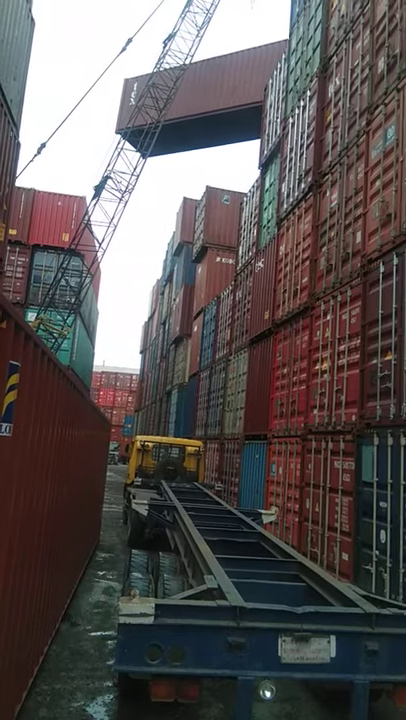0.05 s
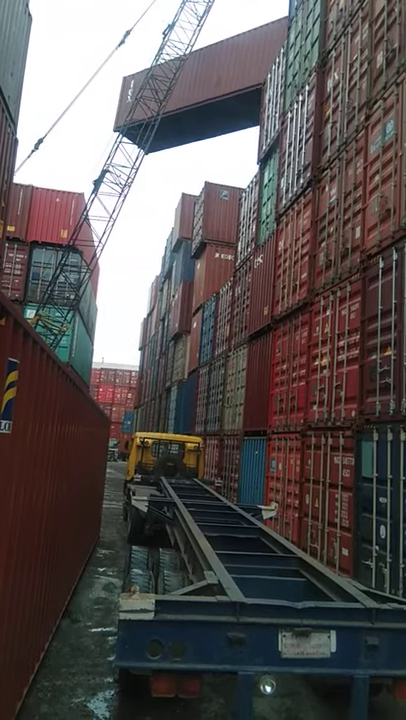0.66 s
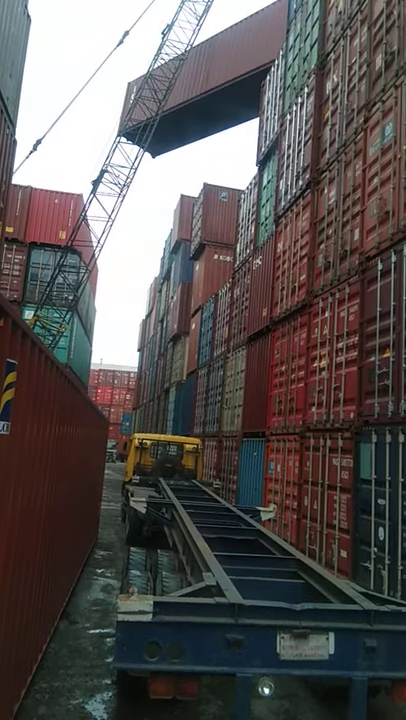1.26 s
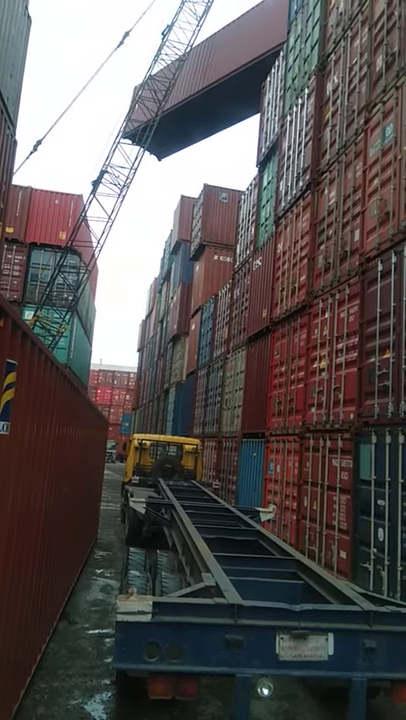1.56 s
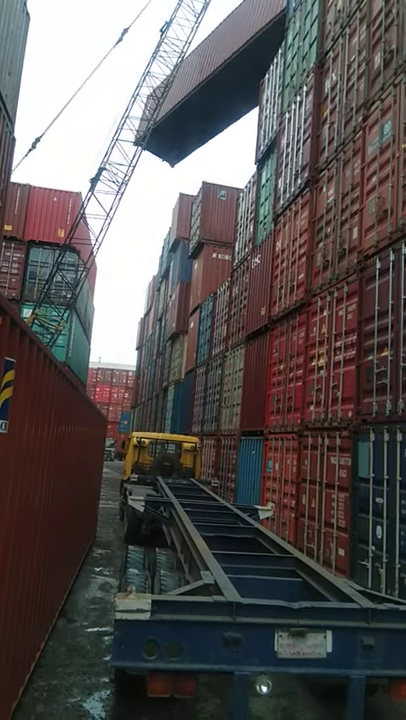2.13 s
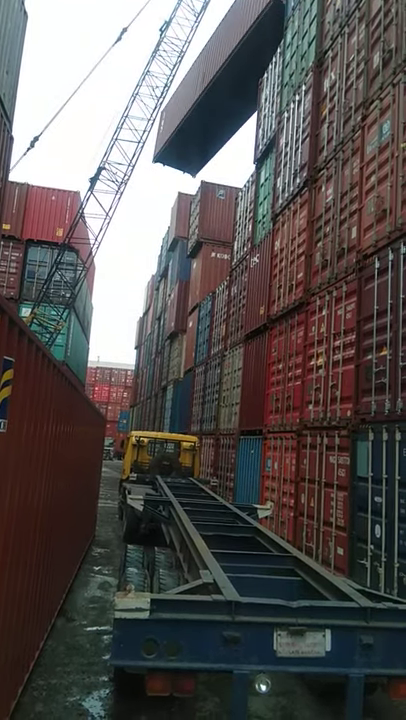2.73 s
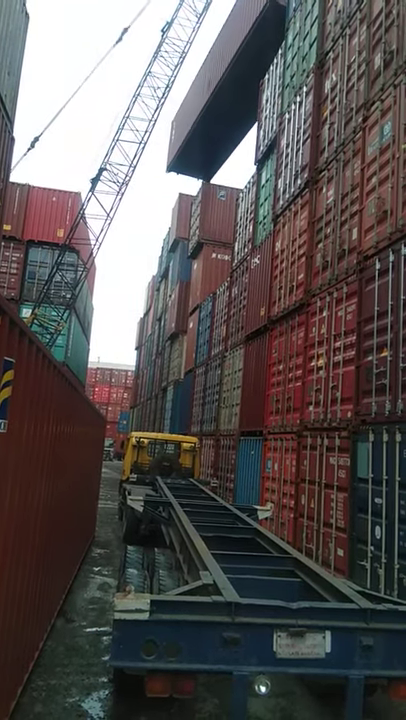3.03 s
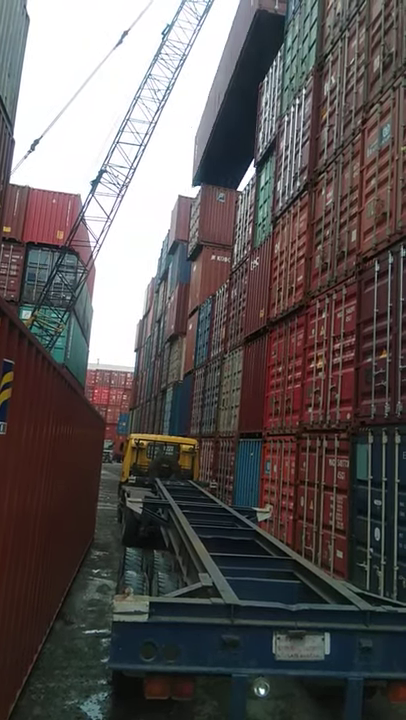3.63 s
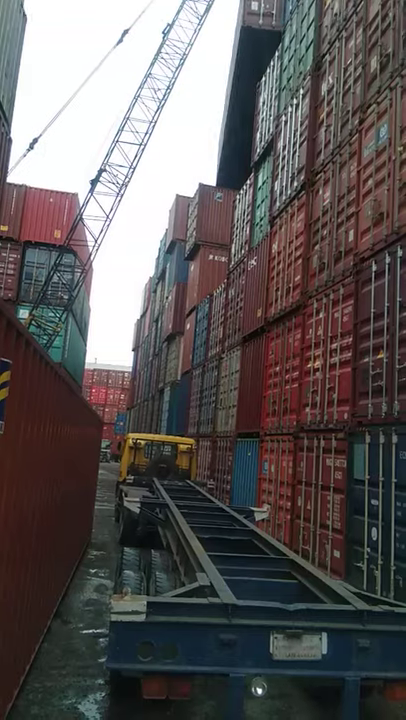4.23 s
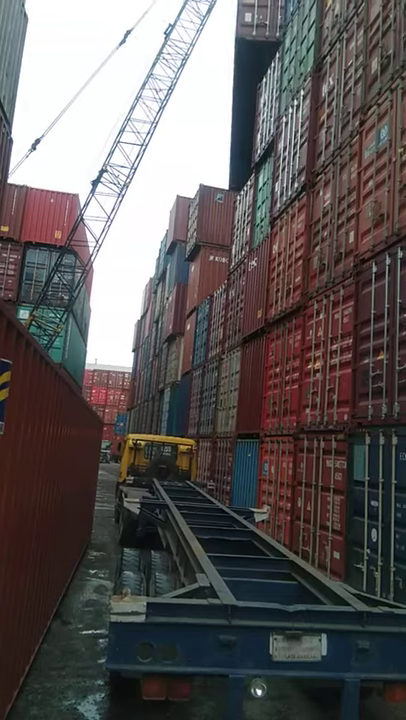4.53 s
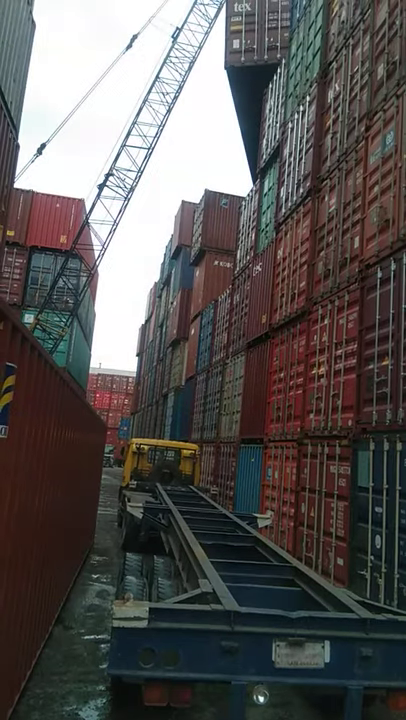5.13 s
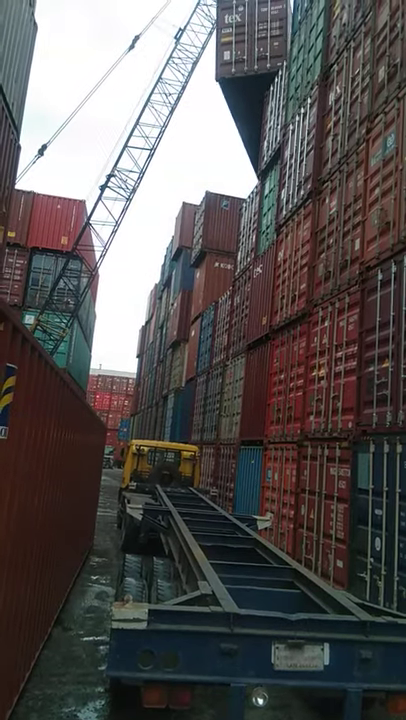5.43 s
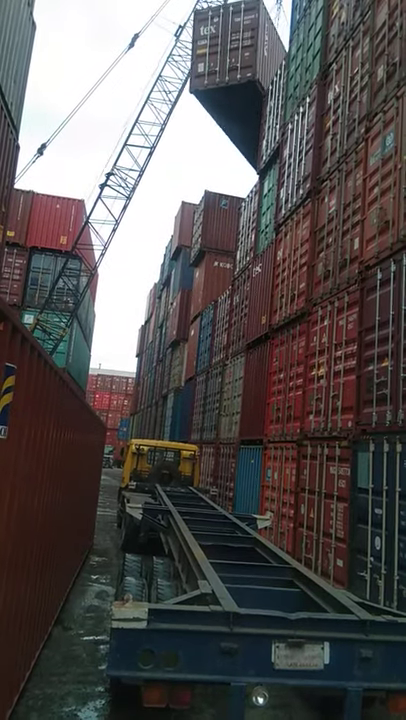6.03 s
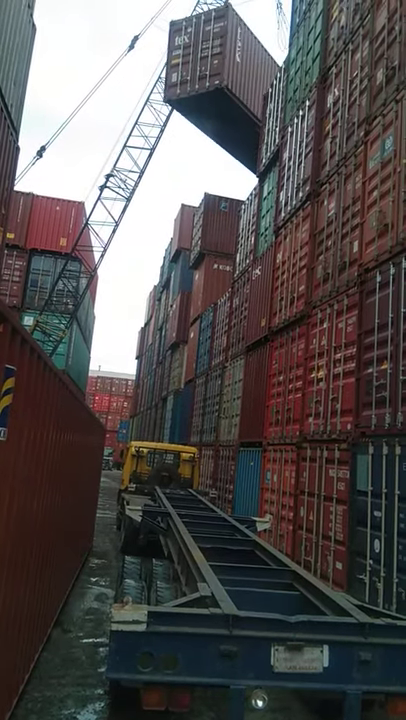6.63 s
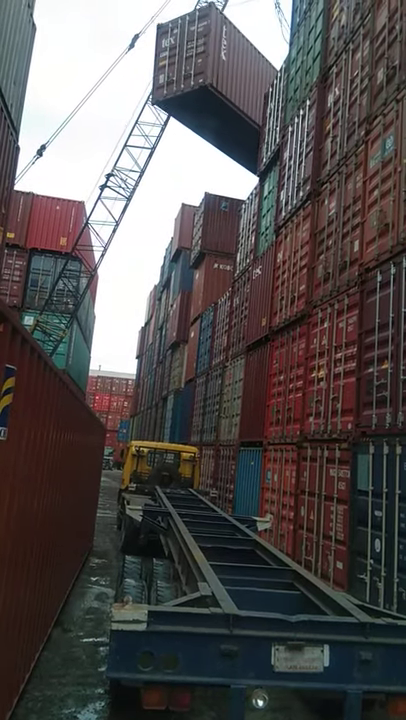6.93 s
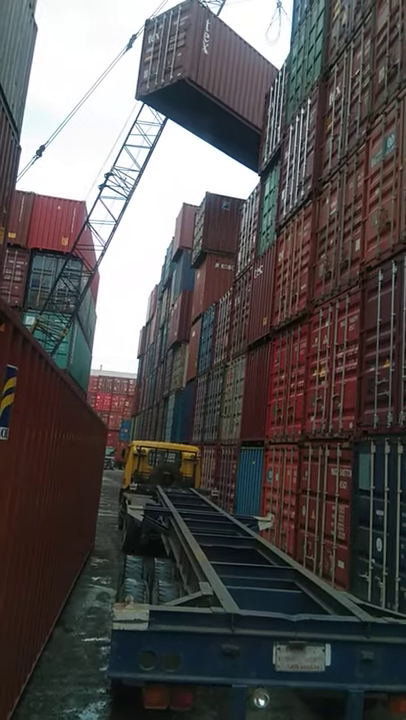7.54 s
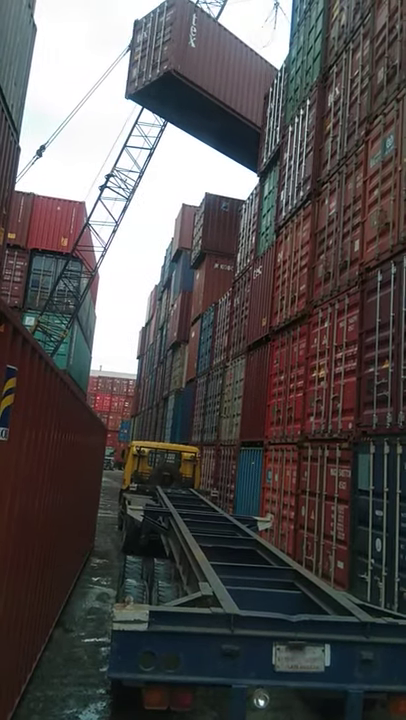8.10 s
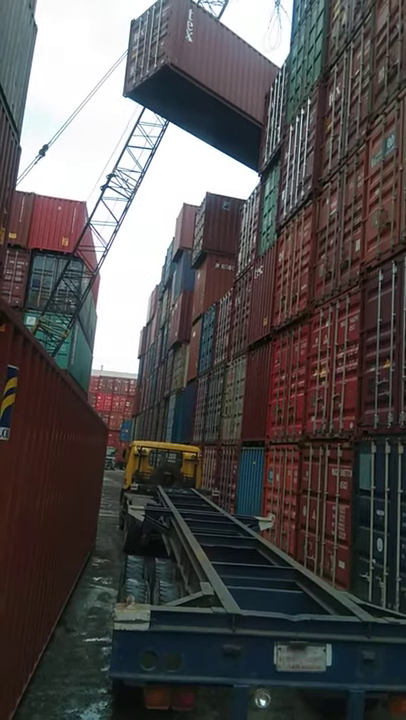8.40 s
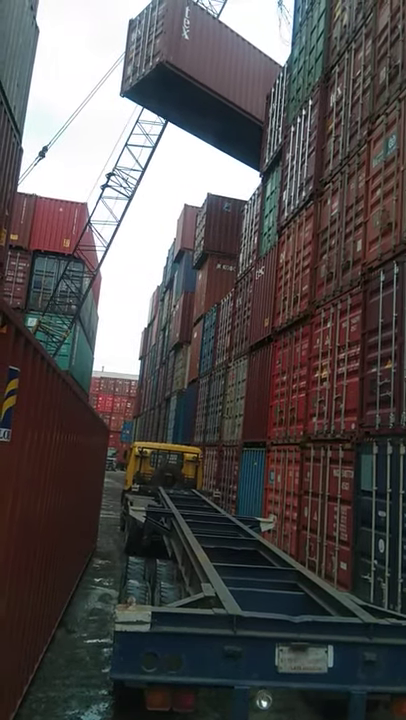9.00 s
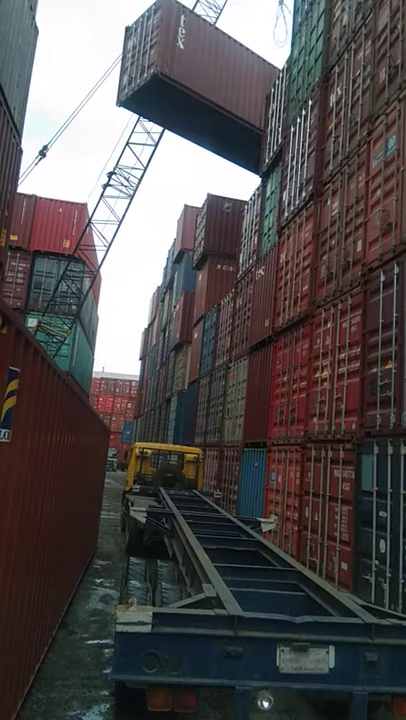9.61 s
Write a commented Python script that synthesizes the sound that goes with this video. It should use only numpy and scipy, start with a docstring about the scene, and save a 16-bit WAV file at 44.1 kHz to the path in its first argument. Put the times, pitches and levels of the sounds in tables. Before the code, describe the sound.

In a container yard, a nearby truck engine rumbles steadily at idle, its knocking blurred by the steel stacks, with a faint repeating squeak and a distant crane's low drone beneath. Faint puffs of air and a small tick pass midway. Later the air brake hisses sharply, venting twice in quick succession with hollow booms underneath, then dies away. A last faint puff and rumble come as the engine keeps running.

```python
"""A diesel truck idles near the microphone, in an alley of stacked containers; a crane drones further off.
The exhaust throbs once per engine cycle, the cylinders knock evenly under a few heavier accents,
a dry part squeaks, and the steel walls smear the knocking into a wash.
About seven seconds in, an air brake vents twice, with hollow booms and rumbles under its hiss.
Faint puffs of air and one short tick come before it, and one more puff after."""
import sys
import numpy as np
from scipy import signal
from scipy.fft import rfft, irfft, next_fast_len
from scipy.io import wavfile

SR = 44100
rng = np.random.default_rng(int(sys.argv[2]) if len(sys.argv) > 2 else 0)


def store_wav(level_fs):
    """Save 16-bit WAV to argv[1]."""
    pcm = np.round(np.clip(np.atleast_2d(level_fs), -1, 1) * 32767)
    wavfile.write(sys.argv[1], SR, pcm.T.astype(np.int16))


N = 430416
TIME = np.arange(N) / SR
FFT_SIZE = next_fast_len(N, real=True)
FREQS = np.maximum(np.arange(FFT_SIZE // 2 + 1) * SR / FFT_SIZE, 1)

CYCLE_HZ, CYLINDERS = 4.7428, 6
FIRING_DB, FIRING_HZ, FIRING_OCTAVES = -4.5, 380, 1.9   # strength, pitch and spread of an even knock
FIRING_RISE_S, FIRING_DECAY_S = 0.0024, 0.011   # the walls round off the front of each knock

# The crane's distant diesel. Each row: multiple of its firing rate, average level in dB.
CRANE_HARMONICS = [(1, -51.5), (2, -46), (3, -53)]
# Faint puffs of air and one short tick. Each row: centre in seconds, level at the crest in dB,
# half length in seconds.
PUFFS_AND_TICK = [(3.95, -52, .02), (4.01, -56, 0.028), (4.871, -46, .003), (9.69, -50.5, 0.094)]
# Colour of the puffs and the tick. Each row: frequency in Hz, relative level in dB.
PUFF_AND_TICK_SPECTRUM = [(1000, -6), (2500, 5), (4000, 0), (6700, 1), (7700, -15), (13000, -56)]
# Hollow rumbles. Each row: centre in seconds, level at the crest in dB, half length in seconds,
# treble cutoff in Hz.
RUMBLE_SWELLS = [(7.255, -28, 0.016, 800), (7.28, -29, 0.098, 800), (7.55, -36.5, 0.23, 500),
                 (7.93, -31.5, 0.086, 430), (9.678, -34.5, 0.071, 500)]
# Colour of the rumbles. Each row: frequency in Hz, relative level in dB.
RUMBLE_SPECTRUM = [(25, -20), (80, 3), (128, -3), (180, -4), (300, 0), (450, -2.5), (650, -14.5),
                   (1300, -39), (9000, -90)]
# Hollow resonances in the rumbles. Each row: centre in Hz, width in Hz, gain in dB.
HOLLOW_RESONANCES = [(127.3, 10.4, 12), (228, 20, 2.5), (350, 26, 3)]
# Booms that stand out of the rumbles. Each row: centre in seconds, pitch in Hz,
# level at the crest in dB, half length in seconds.
HOLLOW_BOOMS = [(7.27, 346, -26, 0.012), (7.31, 128, -29, 0.019), (7.312, 245, -34, 0.015),
                (7.395, 128, -36, 0.021), (7.875, 233.5, -33, .013), (7.93, 128, -37, 0.037),
                (7.953, 232.2, -32, 0.024), (8.035, 127, -31, 0.015)]
# Ventings of the brake valve. Each row: start in seconds, seconds open, level in dB before the sag.
BRAKE_VENTS = [(7.205, 0.86, -34), (7.87, 0.14, -42)]
# Colour of the escaping air. Each row: frequency in Hz, relative level in dB.
JET_SPECTRUM = [(600, 2), (900, -4), (1500, -3), (2200, -7), (2800, -8.5), (3300, -12), (3800, -9.5),
                (6000, -11), (6800, -14), (7600, -25), (9000, -35), (11000, -49), (15000, -68)]
# Whistles of the valve. Each row: centre in Hz, width in Hz, gain in dB.
VALVE_WHISTLES = [(2215, 60, 4), (3800, 140, 8), (4130, 60, 3), (5640, 80, 3)]
# Squeaks of a dry engine part. Each row: place as a share of the cycle, half length in seconds,
# typical level at the crest in dB.
DRY_SQUEAKS = [(0.127, 0.027, -62.5), (0.795, .018, -64.5)]
# Heavier knocks, once a cycle. Each row: place as a share of the cycle, centre in Hz,
# spread in octaves, rise and fall time in seconds, strength over the wash in dB.
KNOCK_ACCENTS = [(0.98, 500, 0.47, 0.013, 3), (1, 1180, 0.84, 0.025, 2), (0.33, 200, 0.27, 0.0026, 7.5),
                 (0.372, 1100, 0.4, 0.0057, 4), (0.52, 1130, 1.07, .016, -1.5),
                 (0.75, 2500, 4.3, 0.048, -4.5), (0.13, 1900, 0.65, 0.0028, 2)]
# Colour of the engine's wash at the microphone. Each row: frequency in Hz, relative level in dB.
WASH_SPECTRUM = [(18, -14), (42, -20.5), (66, 1), (105, 4.5), (150, -1), (420, -5), (620, -9.5),
                 (1100, -18), (1650, -20), (2400, -25.5), (3300, -31.5), (6900, -34), (7600, -43),
                 (14000, -79)]
# Resonances of the engine and the steel around it. Each row: centre in Hz, width in Hz, gain in dB.
STEEL_RESONANCES = [(71, 9.7, -1), (172, 27, 1), (236.6, 24, 2), (285, 75, -2), (338, 4.4, 4),
                    (380.5, 6.6, 7), (410, 50, 1), (465, 18, 5), (494, 36, -7.5), (540.8, 10.7, 7),
                    (607, 24, -5), (687, 18, 0.5), (1057, 34, -6), (1120, 40, 1.5), (1570, 100, 2.5),
                    (1790, 110, 2.5), (3880, 180, 4), (5620, 170, 1.5), (6230, 770, 2.5), (7170, 270, -3),
                    (10130, 900, 5.5)]
# The wash is quieter around the exhaust note, leaving a steady hum.
# Each row: centre in Hz, width in Hz, gain in dB.
WASH_BASS_DIP = [(92, 44, -4)]
# The part of the wash that comes back alike every cycle. Each row: frequency in Hz, share of power.
REPEATING_SHARE = [(60, .05), (115, .05), (135, .4), (170, .55), (400, .5), (560, .55), (800, .2),
                   (1700, .16), (2400, .06), (5000, .01)]
# Tones of the exhaust. Each row: multiple of the engine's cycle rate, relative level in dB.
EXHAUST_ORDERS = [(9, -60), (10, -54), (12, -58), (13, -56), (16, -55), (17, -50), (18, -41), (20, -32.8),
                  (22, -49), (23, -47.5), (24, -53), (25, -44), (26, -50), (27, -55)]
# Slow swell of the exhaust note. Each row: time in seconds, gain in dB.
EXHAUST_SWELL_DB = [(0, -1.5), (1.5, 1), (2.3, 1.5), (2.8, -1), (4.9, -1), (5.6, 0.5), (6.9, 0), (7.9, 2.1),
                    (8.6, 0), (9.1, 1.4), (9.76, 0)]


def from_db(db):
    """Decibels to amplitude."""
    return 10 ** (np.asarray(db) / 20)


def rms_one(x):
    """Scales a sound to rms 1."""
    return x / np.sqrt(np.mean(x ** 2) + 1e-20)


def curve(points):
    """Reads a table along a logarithmic frequency axis."""
    known_hz, values = np.transpose(points)
    return np.interp(np.log(FREQS), np.log(known_hz), values)


def peaks_db(resonances):
    """Bell-shaped bumps and notches along the frequency axis."""
    return sum(db / (1 + (2 * (FREQS - hz) / width) ** 2) for hz, width, db in resonances)


def drift(rate_hz):
    """A smooth random wander, mostly slower than `rate_hz`; spread 1."""
    step = 100
    pole = np.exp(-2 * np.pi * rate_hz * step / SR)
    slow = signal.lfilter([1], [1, -2 * pole, pole * pole], rng.standard_normal(2 * N // step))
    settled = rms_one(slow[N // step:])
    return np.interp(np.arange(N) / step, np.arange(len(settled)), settled)


def coloured(x, gain_db):
    """Gives a sound a spectrum; rms 1."""
    return rms_one(irfft(rfft(x, FFT_SIZE) * from_db(gain_db), FFT_SIZE)[:N])


def noise(spectrum, shaping_db=0):
    """Turbulent noise of a given colour; rms 1."""
    return coloured(rng.standard_normal(N), curve(spectrum) + shaping_db)


def tone(hz):
    """A sine that follows a pitch; rms 1."""
    return np.sqrt(2) * np.sin(2 * np.pi * (np.cumsum(hz) / SR + rng.random()))


def burst(away_s, db, half_s):
    """Gain of a smooth burst that crests where `away_s` is zero."""
    return from_db(db) * np.exp(-.5 * (away_s / half_s) ** 2)


def seconds_from(place, cycles):
    """Time to the nearest pass of a place in the engine cycle."""
    return np.abs((cycles - place + .5) % 1 - .5) / CYCLE_HZ


def crane(firing_hz, wander, waver_db):
    """Far off, a diesel drones faint and low, its speed wandering with the load."""
    rate_hz = firing_hz * (1 + wander * drift(.4))
    return sum(from_db(db + waver_db * drift(0.96)) * tone(order * rate_hz)
               for order, db in CRANE_HARMONICS)


def puffs_and_tick():
    """Bursts of bright noise: faint puffs of air and one short tick."""
    gain = sum(burst(TIME - at_s, db, half_s) for at_s, db, half_s in PUFFS_AND_TICK)
    return gain * noise(PUFF_AND_TICK_SPECTRUM)


def rumbles():
    """Each swell of low noise excites the same hollow resonances."""
    out = np.zeros(N)
    for at_s, db, half_s, cutoff_hz in RUMBLE_SWELLS:
        dull_db = -10 * np.log10(1 + (FREQS / cutoff_hz) ** 4)
        hollow = noise(RUMBLE_SPECTRUM, peaks_db(HOLLOW_RESONANCES) + dull_db)
        out += burst(TIME - at_s, db, half_s) * hollow
    return out


def booms(wobble):
    """In each boom one hollow resonance rings out briefly, a little unsteady in pitch."""
    return sum(burst(TIME - at_s, db, half_s) * tone(hz * (1 + wobble * drift(21)))
               for at_s, hz, db, half_s in HOLLOW_BOOMS)


def vent_level_db(attack_s, sag_db_per_s, release_db_per_s):
    """The flow builds quickly, sags with the pressure, and dies in the alley once the valve shuts."""
    power = 1e-12
    for opens_s, length_s, db in BRAKE_VENTS:
        since_s = TIME - opens_s
        opening = .5 + .5 * np.tanh(since_s / (2 * attack_s))
        sag_db = sag_db_per_s * np.clip(since_s, 0, length_s)
        release_db = release_db_per_s * np.maximum(since_s - length_s, 0)
        power += (opening * from_db(db - sag_db - release_db)) ** 2
    return 10 * np.log10(power)


def air_brake(flutter_db, low_cut_hz, whistle_range_db, whistle_lag_s):
    """Air rushes from the valve; it whistles a moment after the flow has become strong."""
    level_db = vent_level_db(attack_s=0.021, sag_db_per_s=12.5, release_db_per_s=24)
    level_db += flutter_db * drift(14)
    lagging_db = np.interp(TIME - whistle_lag_s, TIME, level_db)
    whistle_share = np.clip(1 + (lagging_db - level_db.max()) / whistle_range_db, 0, 1)
    low_cut_db = -10 * np.log10(1 + (low_cut_hz / FREQS) ** 2)
    whistle = noise(JET_SPECTRUM, peaks_db(VALVE_WHISTLES) + low_cut_db)
    hiss = noise(JET_SPECTRUM, low_cut_db)
    return from_db(level_db) * (np.sqrt(whistle_share) * whistle + np.sqrt(1 - whistle_share) * hiss)


def crankshaft(wander_s, lurch_cycles):
    """Engine cycles gone by; the shaft hurries and slows in each, and the governor lets timing wander."""
    cycles = CYCLE_HZ * (TIME + wander_s * drift(.6))
    return cycles - lurch_cycles * np.sin(2 * np.pi * cycles)


def squeaks(cycles, centre_hz, width_hz, stray_hz, uneven_db):
    """A dry part chirps twice a cycle, thin and rough, never at quite the same strength or pitch."""
    gain = sum(burst(seconds_from(place, cycles), db, half_s) for place, half_s, db in DRY_SQUEAKS)
    pitch_hz = centre_hz + stray_hz * drift(5)
    rasp = coloured(rng.standard_normal(N), -10 * np.log10(1 + (FREQS / width_hz) ** 6))
    return gain * from_db(uneven_db * drift(3)) * rasp * tone(pitch_hz)


def knock_power(cycles, hz):
    """Power of the knocks near one pitch: an even firing from each cylinder, and the accents on top."""
    def reach(centre_hz, octaves):
        return np.exp(-.5 * (np.log2(hz / centre_hz) / octaves) ** 2)

    since_firing_s = (cycles * CYLINDERS % 1) / (CYLINDERS * CYCLE_HZ)
    knock = (1 - np.exp(-since_firing_s / FIRING_RISE_S)) * np.exp(-since_firing_s / FIRING_DECAY_S)
    power = from_db(FIRING_DB) ** 2 * reach(FIRING_HZ, FIRING_OCTAVES) * knock
    for place, centre_hz, octaves, fall_s, db in KNOCK_ACCENTS:
        accent = np.exp(-seconds_from(place, cycles) / fall_s)
        power += from_db(db) ** 2 * reach(centre_hz, octaves) * accent
    return power


def clatter(cycles, level_db, uneven_db):
    """Each cycle sends the same echoes down the alley, mixed with fresh noise and pulsed by the knocks."""
    echo_phases = 2 * np.pi * rng.random(round(SR / CYCLE_HZ / 2))
    echoes = rms_one(irfft(np.exp(1j * echo_phases)))   # one cycle long
    position = (cycles % 1 * len(echoes)).astype(int) % len(echoes)
    repeated = rfft(echoes[position], FFT_SIZE)
    fresh = rfft(rng.standard_normal(FFT_SIZE))
    share = curve(REPEATING_SHARE)
    wash = np.sqrt(share) * repeated + np.sqrt(1 - share) * fresh
    force = from_db(uneven_db * drift(24))   # no two firings are equally hard
    edges_hz = [0, 140, 300, 600, 1100, 2400, 4500, SR / 2]
    one_cycle = np.linspace(0, 1, 512)
    pulsed = np.zeros(N)
    for low, high in zip(edges_hz, edges_hz[1:]):
        band = irfft(wash * ((FREQS >= low) & (FREQS < high)), FFT_SIZE)[:N]
        centre_hz = max(low * np.sqrt(2), 1)
        knocks = np.interp(cycles % 1, one_cycle, knock_power(one_cycle, centre_hz))
        pulsed += band * rms_one(np.sqrt(1 + force ** 2 * knocks))
    colour_db = curve(WASH_SPECTRUM) + peaks_db(STEEL_RESONANCES) + peaks_db(WASH_BASS_DIP)
    return from_db(level_db) * coloured(pulsed, colour_db)


def exhaust(cycles, gain_db, throb_at, scatter_rad, waver_db):
    """Even firings drone; uneven cylinders add tones that crest together in one throb per cycle."""
    drone = np.zeros(N)
    for order, db in EXHAUST_ORDERS:
        phase = 2 * np.pi * order * (cycles - throb_at) + scatter_rad * rng.standard_normal()
        drone += np.sqrt(2) * from_db(db) * np.cos(phase)
    swell_db = np.interp(TIME, *np.transpose(EXHAUST_SWELL_DB))
    return drone * from_db(gain_db + swell_db + waver_db * drift(18))


def scene():
    """One microphone in the alley hears the truck and its air brake nearby, the crane beyond."""
    cycles = crankshaft(wander_s=0.00027, lurch_cycles=.002)
    truck = exhaust(cycles, gain_db=0.5, throb_at=.005, scatter_rad=.35, waver_db=.3)
    truck += clatter(cycles, level_db=-32.5, uneven_db=0.66)
    truck += squeaks(cycles, centre_hz=6790, width_hz=130, stray_hz=55.1, uneven_db=3)
    brake = air_brake(flutter_db=0.4, low_cut_hz=270, whistle_range_db=7, whistle_lag_s=0.037)
    background = puffs_and_tick() + crane(firing_hz=66.03, wander=.005, waver_db=1.5)
    return (background + rumbles() + booms(wobble=0.0153) + brake + truck)[None]


def record(dry):
    """The sound fades in without a click, the microphone adds a faint hiss, and the top is cut."""
    fade_in = np.minimum(TIME / .004, 1)
    mic_hiss = from_db(-79) * rng.standard_normal(dry.shape)
    low_pass = signal.ellip(10, .1, 80, 15500, fs=SR, output="sos")
    return signal.sosfilt(low_pass, fade_in * dry + mic_hiss)


dry = scene()
out = record(dry)
store_wav(out)
```